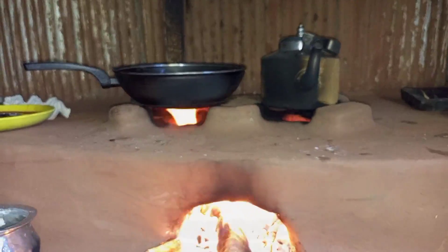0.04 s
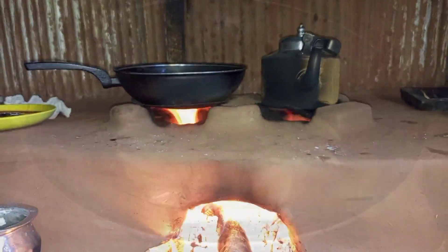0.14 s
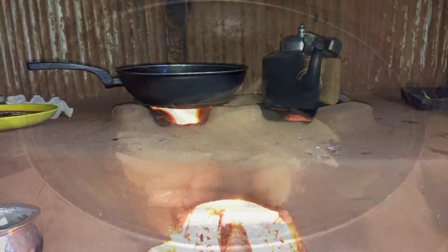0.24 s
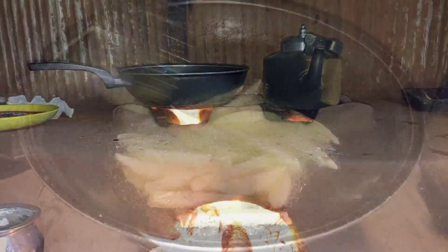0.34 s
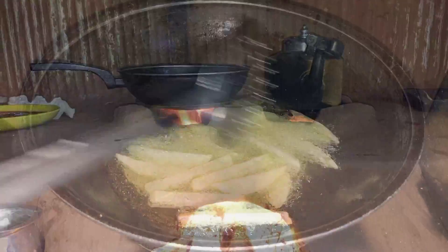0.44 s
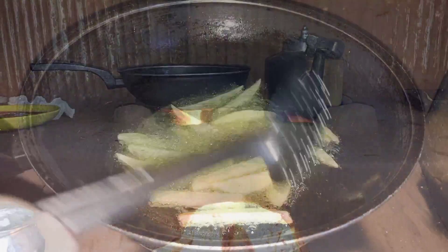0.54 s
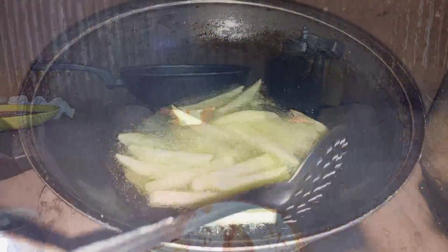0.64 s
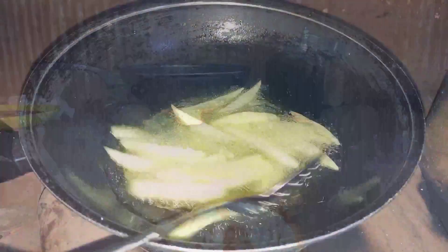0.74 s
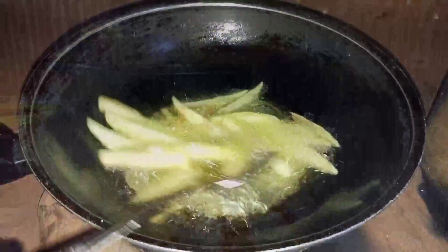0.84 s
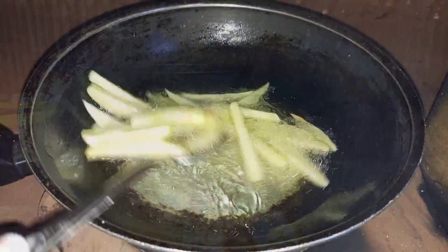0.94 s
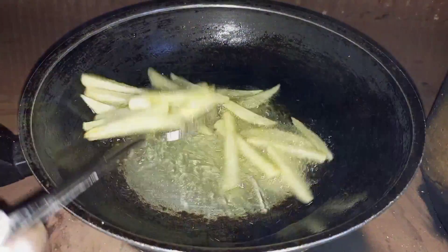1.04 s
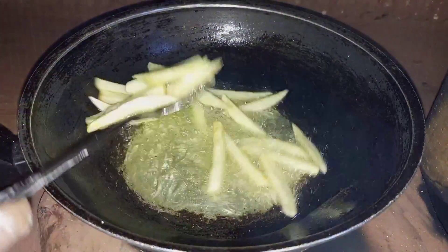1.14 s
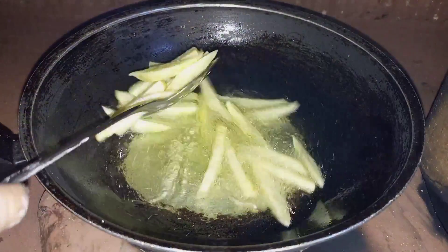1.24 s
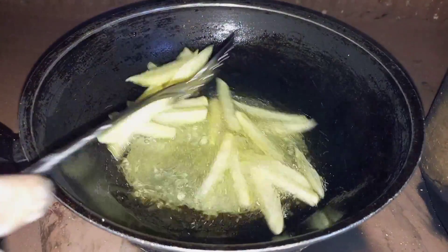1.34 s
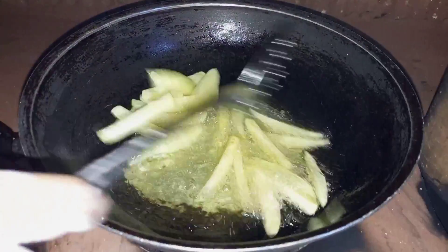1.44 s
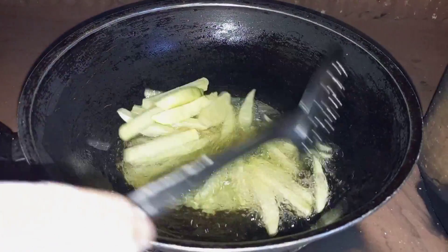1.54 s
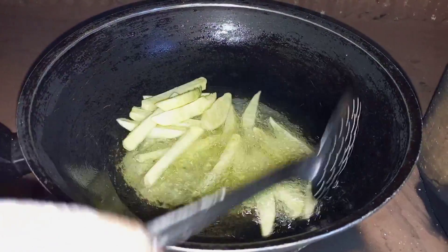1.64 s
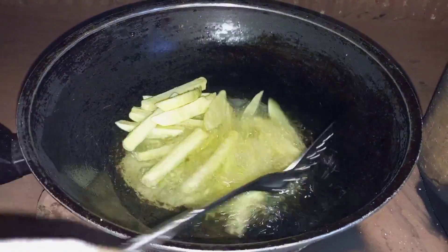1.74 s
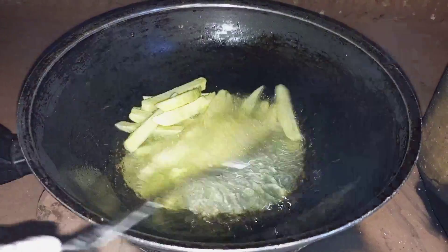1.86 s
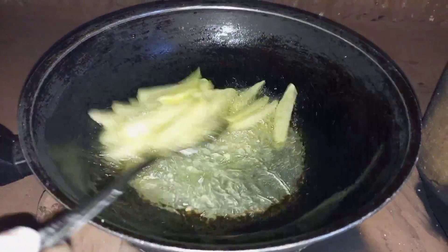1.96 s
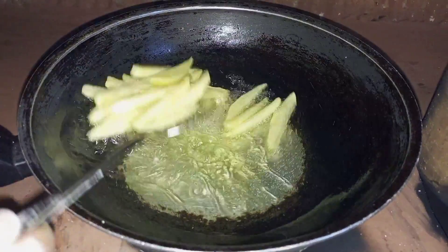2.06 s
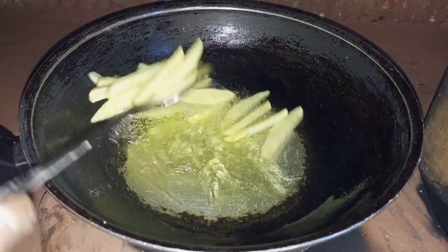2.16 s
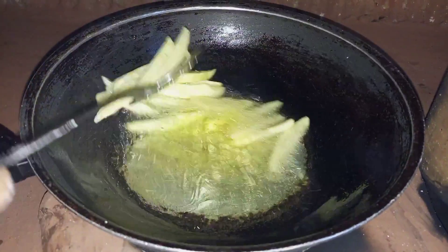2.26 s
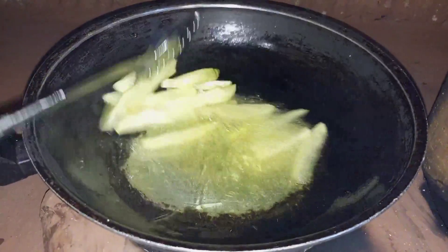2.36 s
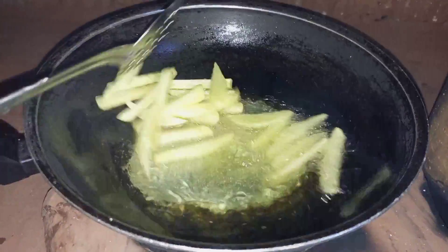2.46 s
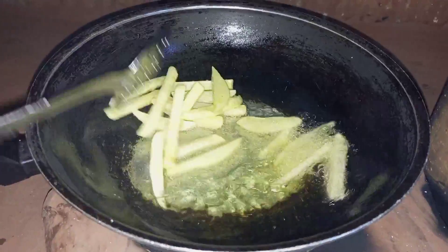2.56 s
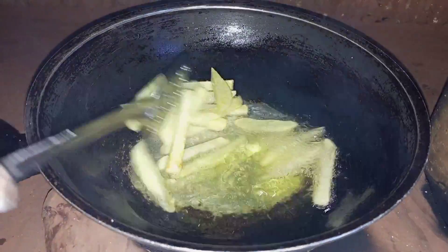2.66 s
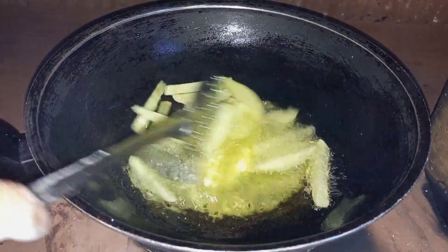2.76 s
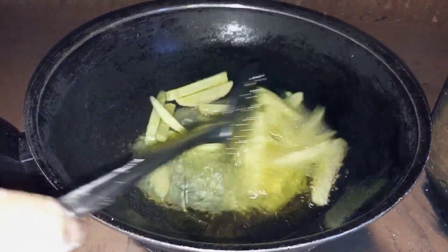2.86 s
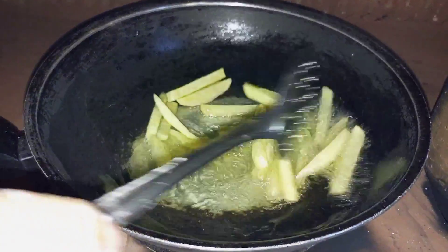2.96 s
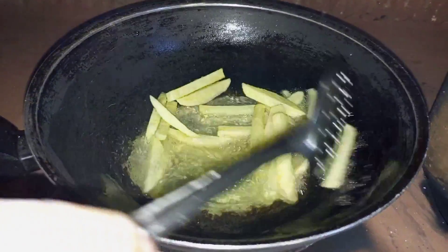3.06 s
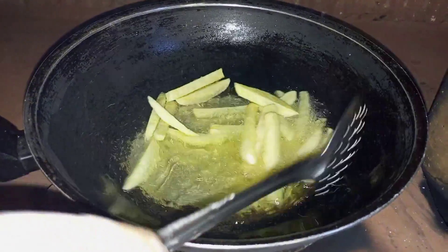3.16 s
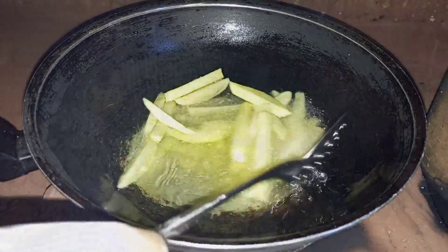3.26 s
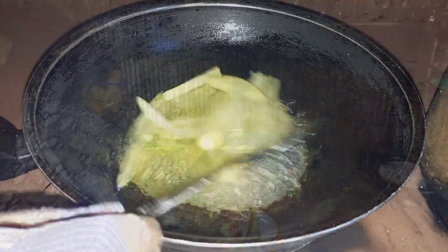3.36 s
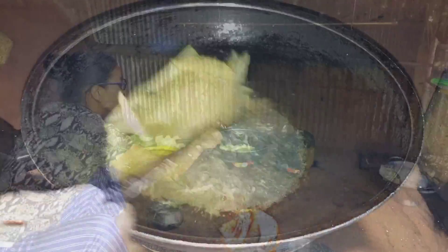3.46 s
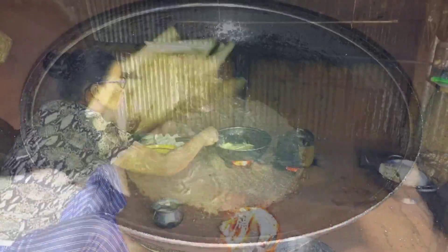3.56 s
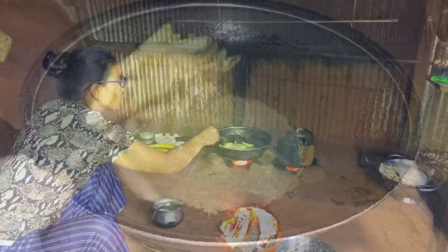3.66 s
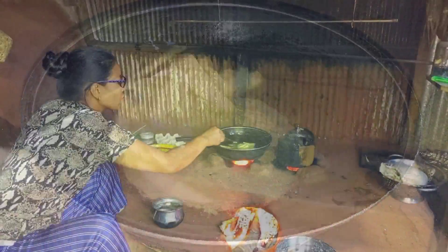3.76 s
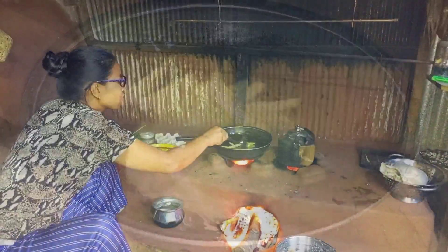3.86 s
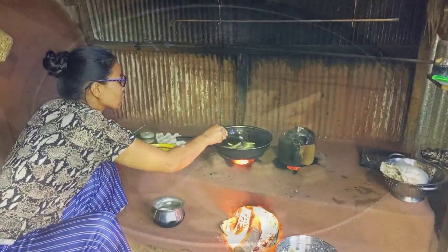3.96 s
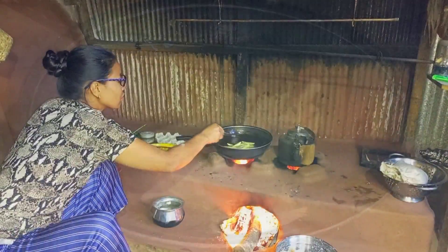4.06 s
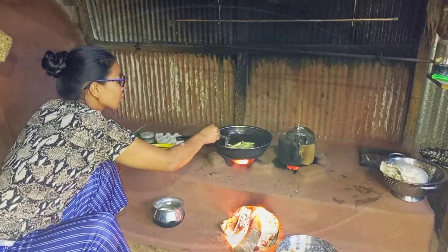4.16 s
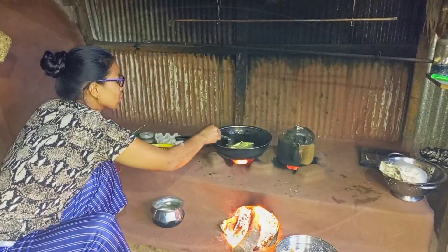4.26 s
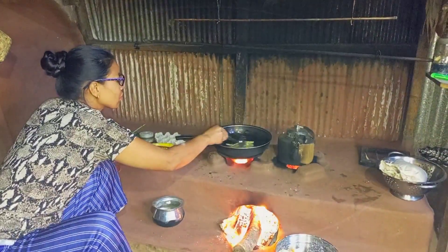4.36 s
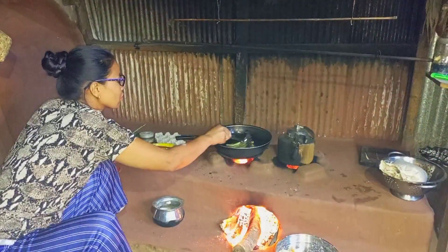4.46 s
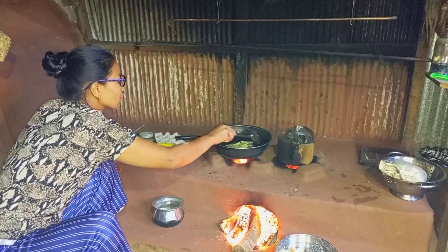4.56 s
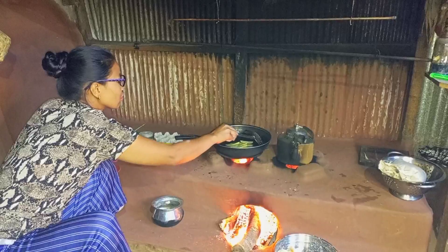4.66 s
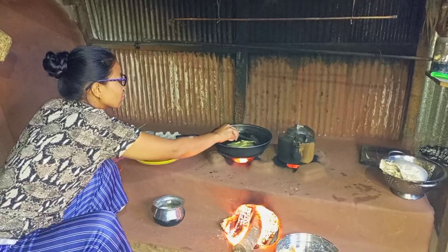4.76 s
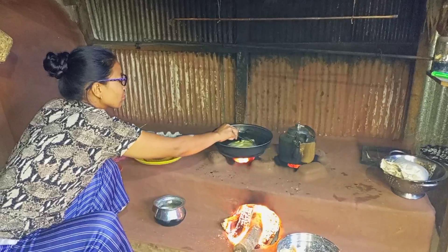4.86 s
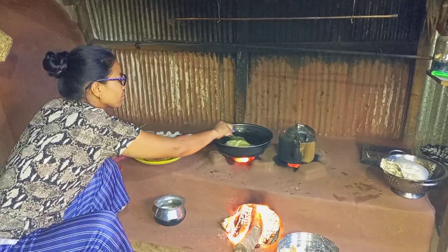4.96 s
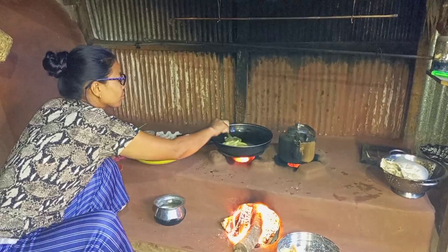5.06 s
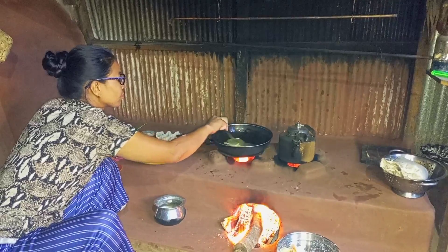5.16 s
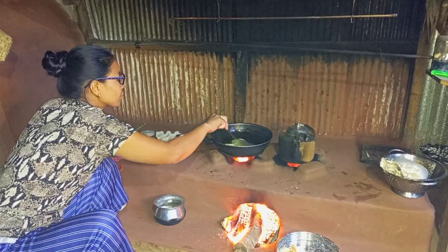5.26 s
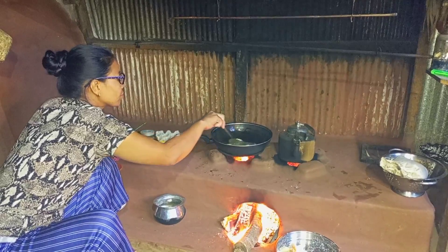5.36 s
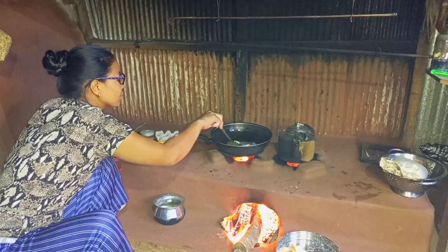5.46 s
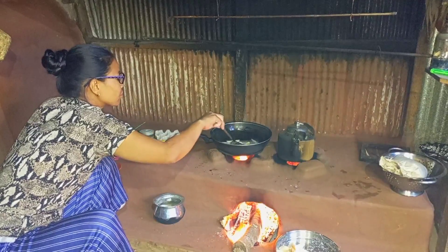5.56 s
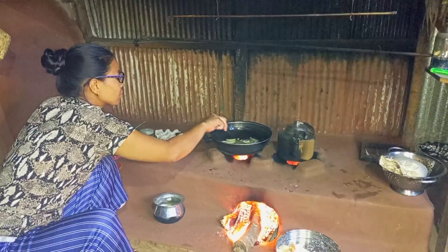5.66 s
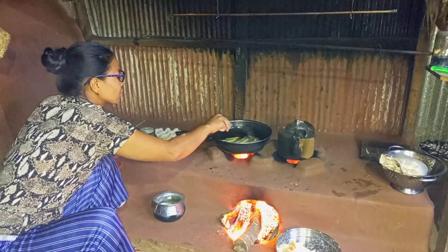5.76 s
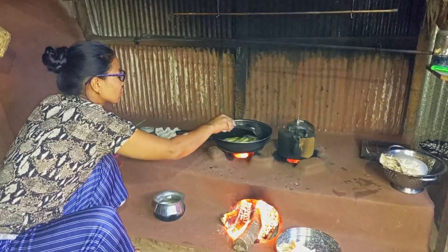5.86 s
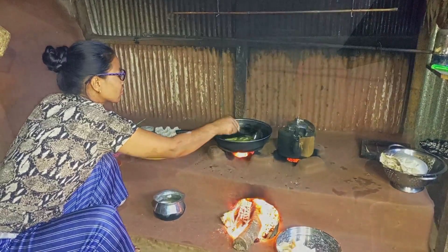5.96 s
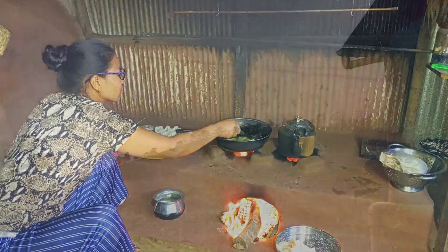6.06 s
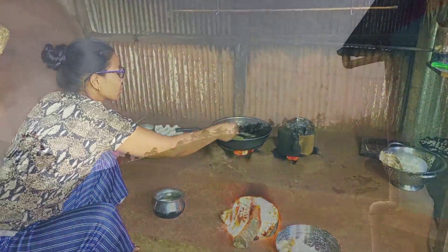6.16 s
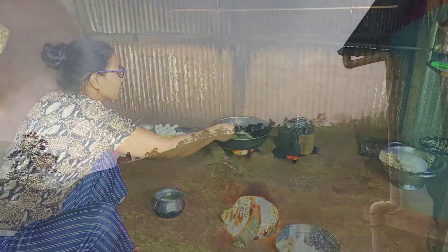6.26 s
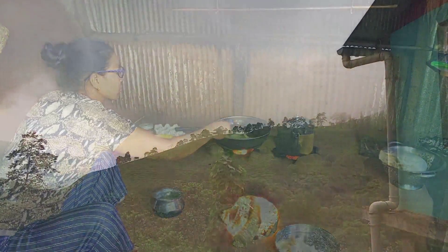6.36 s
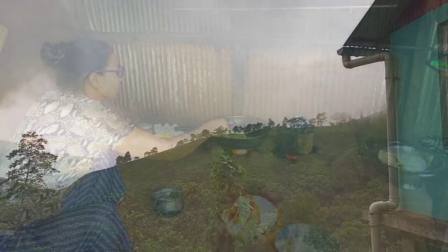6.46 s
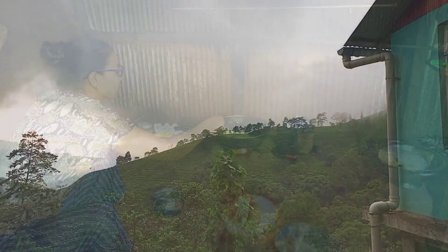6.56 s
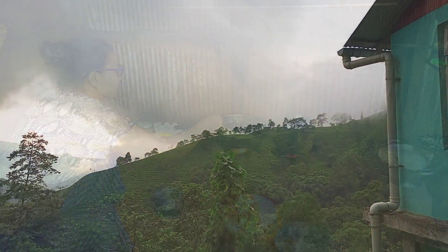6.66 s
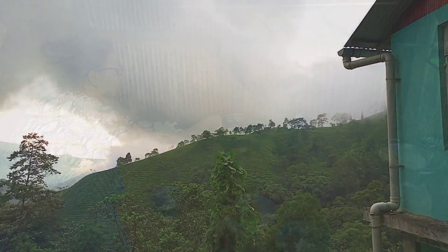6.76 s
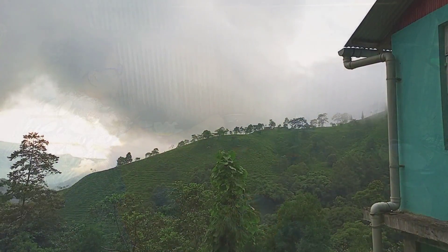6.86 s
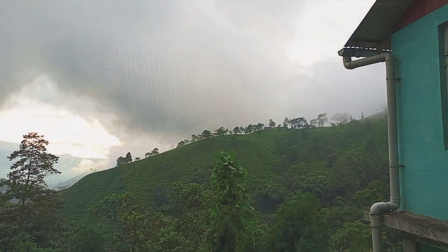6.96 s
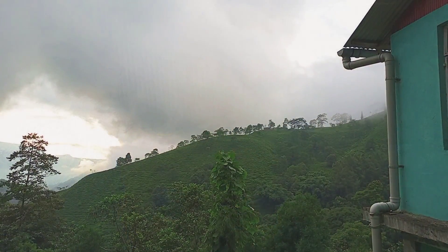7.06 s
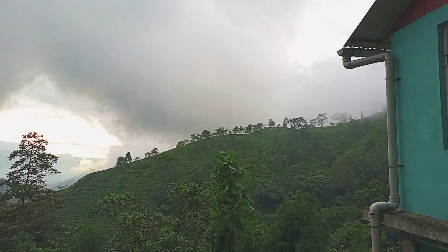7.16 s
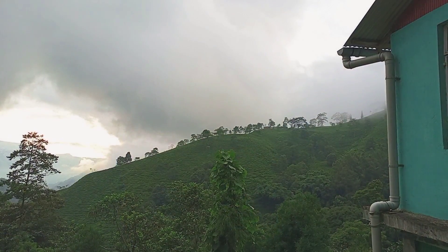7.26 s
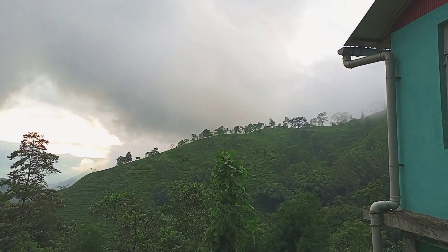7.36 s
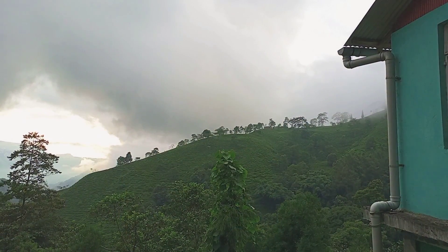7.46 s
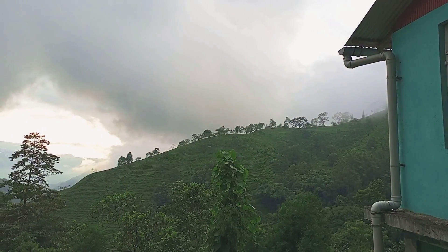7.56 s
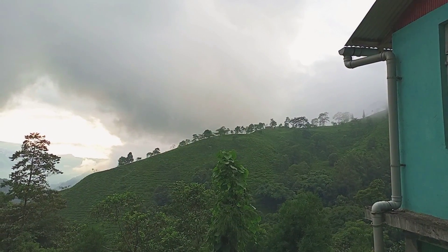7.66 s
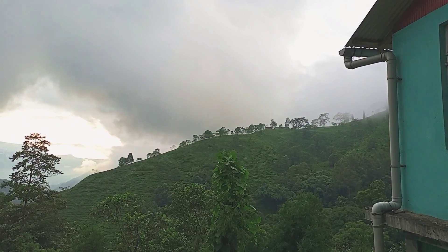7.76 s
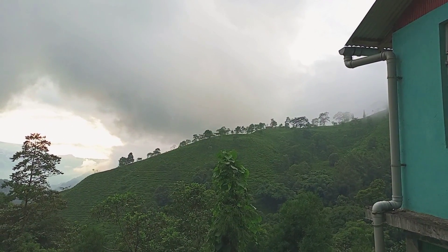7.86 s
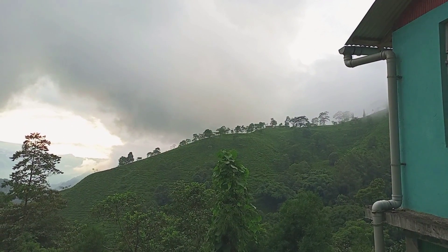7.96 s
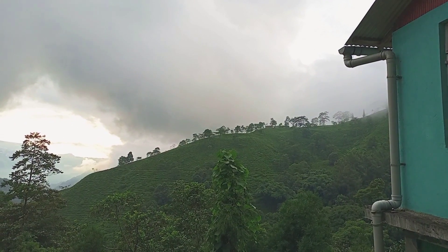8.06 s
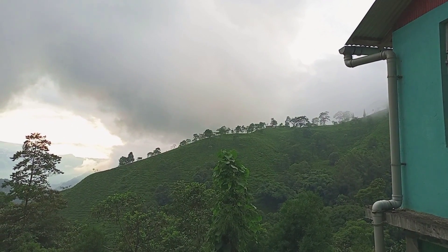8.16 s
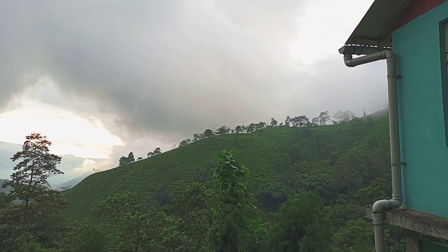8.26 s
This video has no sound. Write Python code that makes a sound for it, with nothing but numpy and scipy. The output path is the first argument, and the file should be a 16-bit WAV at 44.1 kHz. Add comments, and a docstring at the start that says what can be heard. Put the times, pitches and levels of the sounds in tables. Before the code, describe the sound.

Potato sticks sizzle and bubble in hot oil in a small kitchen, with the faint low rumble of a wood fire underneath. A metal spatula knocks against the wok and scrapes across it, some strokes rising in pitch. After about four seconds the frying grows quieter and the strokes become sparser. Near the end it fades into a steady hillside hiss with chirring insects. The sound is mono.

```python
"""Potatoes frying in a wok

Potato sticks fry over a wood fire: steam bubbles burst in the oil while a slotted metal spatula turns them.
Each stroke lands with a knock, scrapes over the bottom and rises in pitch as the blade climbs the wall.
The kitchen then fades into the steady hiss of a hillside with insects. Mono."""
import sys
import numpy as np
from scipy import signal
from scipy.fft import rfft, irfft, next_fast_len
from scipy.io import wavfile

SR = 44100
rng = np.random.default_rng(int(sys.argv[2]) if len(sys.argv) > 2 else 0)


def file_out(sig):
    """Save sig as 16-bit WAV at sys.argv[1]."""
    # one column per channel
    cols = np.atleast_2d(sig).T
    # limit, then scale
    lim = np.clip(cols, -1, 1)
    pcm = np.round(lim * 32767).astype(np.int16)
    wavfile.write(sys.argv[1], SR, pcm)


N = 366559
T = np.arange(N) / SR

# Frying oil. Each row: time in seconds, level in dB before flares.
OIL_LEVEL = [(0.0, -54), (0.55, -56.5), (1.17, -51), (1.42, -49), (1.63, -47), (2.15, -49), (2.6, -45.5),
             (2.78, -51.5), (3.03, -49.5), (3.32, -48.5), (4.22, -59), (5.37, -57.5), (5.64, -55.5),
             (5.98, -56.5), (6.16, -59.5), (6.45, -65)]
# Oil left alone and freshly stirred. Each row: frequency in Hz, relative density in dB.
CALM_SPECTRUM = [(100, -35), (500, -35), (1300, -20.5), (2600, -8), (3500, -12.5), (4600, -11.5),
                 (5100, -1), (5600, 2), (7400, -4.5), (9200, 1.5), (10400, -2.5), (10900, -13),
                 (13800, -24), (14700, -9.5)]
STIRRED_SPECTRUM = [(100, -41), (500, -24), (1300, -18), (1900, -11), (3300, -16), (4650, -17), (5050, -21),
                    (6300, 2.5), (8000, -2.5), (9000, 2), (10500, -6.5), (11000, -17), (13900, -22),
                    (14900, -13.5)]

def sizzle(pop_s=0.00029, spit_gain=0.43, flutter_db=0.94, calm_db=-56, stirred_db=-48):
    """Steam bubbles burst over a fine fizz; stirring makes the oil spit and changes its colour."""
    t = np.arange(SR // 100) / SR
    pops = np.zeros(N)
    for hz in np.linspace(1000, 15500, 20):
        pop = np.exp(-t / pop_s) * np.cos(2 * np.pi * hz * t)
        pops += signal.oaconvolve(clicks(per_s=700, spread_db=2.2), pop)[:N]
    oil_db = np.interp(T, *np.transpose(OIL_LEVEL))
    stirred = np.clip((oil_db - calm_db) / (stirred_db - calm_db), 0, 1)
    spits = unit(clicks(per_s=260, spread_db=3)) * (0.1 + stirred)
    fizz = rng.standard_normal(N)
    bursts = (unit(pops) + spit_gain * spits + fizz) * amp(flutter_db * wander(35))
    oil = (1 - stirred) * colour(bursts, CALM_SPECTRUM) + stirred * colour(bursts, STIRRED_SPECTRUM)
    return level(OIL_LEVEL, fade_s=0.89) * flare() * oil


# Flares of the sizzle. Each row: start in seconds, rise in dB.
FLARES = [(.67, 0.5), (1.38, 2), (2.72, 5.5), (3.075, 4)]

def flare(peak_s=0.038):
    """Gain of the sizzle as wet potato meets the oil: a quick rise, then a decay."""
    ages = [(np.maximum(T - start, 0) / peak_s, db) for start, db in FLARES]
    return amp(sum(db * age * np.exp(1 - age) for age, db in ages))


# Steam jets. Each entry: pitch in Hz.
JET_PITCHES_HZ = [5145, 5660, 6100, 6700]

def steam_jets(gain_db=-11, swell_db=4.0, width_hz=420):
    """Jets of steam swell and fade, each at its own pitch."""
    jets = np.zeros(N)
    for hz in JET_PITCHES_HZ:
        jet = resonate(rng.standard_normal(N), np.full(N, hz), width_hz)
        jets += jet * amp(swell_db * wander(15))
    return amp(gain_db) * level(OIL_LEVEL, fade_s=0.88) * unit(jets)


def bubbles(gain_db=-19, t60_s=0.095, rise_s=0.0043, pitches=48):
    """Larger bubbles each ring briefly at one pitch in the bowl of the wok."""
    t, out = np.arange(SR // 6) / SR, np.zeros(N)
    envelope = amp(-60 * t / t60_s) * (1 - np.exp(-t / rise_s))
    for hz in np.geomspace(1200, 6500, pitches) * rng.uniform(0.98, 1.02, pitches):
        plink = envelope * np.sin(2 * np.pi * hz * t)
        out += signal.oaconvolve(clicks(per_s=22, spread_db=3.5), plink)[:N]
    loudest = level(OIL_LEVEL).max()
    compressed_level = loudest * (level(OIL_LEVEL, fade_s=0.86) / loudest) ** 0.55
    return amp(gain_db) * compressed_level * unit(out)


# Modes of the wok, the clank and the blade. Each row: frequency in Hz, relative level in dB, t60 in seconds.
WOK_MODES = [(342.3, -4.5, 0.15), (382.5, -17.5, 0.32), (470, -8.5, 0.038), (573.4, 5, 0.14),
             (675, -5, 0.11), (806, -2.5, 0.21), (982, -8.5, 0.1), (1084, 0.5, 0.043), (1226.5, -3, 0.17),
             (1400, -7, 0.053), (1462, -3.5, 0.09)]
CLANK_MODES = [(1524, -24.5, 0.33), (1840, 3, 0.047), (1930, -17, 0.27), (2064, 4, 0.12),
               (2560, 11.5, 0.069), (2760, -10, 0.093), (3130, -23, 0.42), (3236, 6.5, 0.12),
               (3950, -10.5, 0.31)]
BLADE_MODES = [(4043, -17.5, 0.33), (4640, -6, 0.11), (4934, 6, 0.07), (4980, 0.5, 0.18), (5440, 4.5, 0.19),
               (5360, 5, 0.017), (6220, 9, 0.013), (6390, 2, 0.12), (6440, -39, 0.036), (6060, -10, 0.051),
               (7500, -32, 0.55), (7600, -8.5, 0.14), (7360, 7.5, 0.17), (9300, 10.5, 0.027),
               (9720, 0, 0.041), (9070, 1, 0.046), (11100, -9, 0.087)]
# Spatula blows. Each row: start in seconds, wok level in dB, wok centre in Hz, clank level in dB,
# blade level in dB, blade centre in Hz, contact time in seconds.
BLOWS = [(.307, -71, 520, -76, -69, 6000, .003), (.760, -43, 423, -51, -36.5, 8100, 0.0067),
         (1.035, -51.5, 1300, -73, -68, 6000, 0.0012), (1.512, -61.5, 350, -62, -68, 6000, .004),
         (1.818, -35.5, 477, -40.5, -31.5, 6000, 0.0067), (1.874, -39.5, 1070, -59, -50, 5130, .008),
         (1.940, -47.5, 340, -52, -46, 5530, 0.0036), (1.973, -44.5, 1320, -50, -51, 6000, 0.0022),
         (2.046, -40.5, 1000, -46.5, -56, 6000, 0.002), (2.527, -46.5, 740, -71, -57, 6200, 0.0032),
         (3.343, -36, 490, -57, -42, 8950, 0.0018), (3.352, -38, 1040, -49, -35.5, 6300, 0.013),
         (3.386, -40.5, 413, -56, -52, 5100, 0.0063), (4.060, -57, 487, -58.5, -48.5, 6900, 0.013),
         (4.880, -44.5, 1130, -60.5, -61.5, 5460, 0.011), (6.046, -50, 1440, -54, -39.5, 5280, 0.015),
         (6.786, -60, 820, -65, -63, 6000, .001)]

def knocks(chatter_rise_s=0.0042, low_cut_ratio=0.39):
    """The blade lands, chatters for a moment, and rings both itself and the wok."""
    t, out = np.arange(SR // 10) / SR, np.zeros(N)
    for start, wok_db, wok_hz, clank_db, blade_db, blade_hz, contact_s in BLOWS:
        chatter = np.exp(-t / contact_s) * (1 - np.exp(-t / chatter_rise_s))
        force = 0.15 * rng.standard_normal(len(t)) * chatter
        force[0] = 1  # first impact
        wok = ring(touched(WOK_MODES, wok_hz, focus_db=11, octaves=0.33), wash=0.9, wash_t60_s=0.21)
        wok = band_pass(wok, low_hz=low_cut_ratio * wok_hz)
        clank_modes = touched(CLANK_MODES, centre_hz=1950, focus_db=-10.5, octaves=1.0, detune=0.033)
        clank = ring(clank_modes, wash=0.77, wash_t60_s=0.21)
        blade_modes = touched(BLADE_MODES, blade_hz, focus_db=9, octaves=0.15)
        blade = ring(blade_modes, wash=0.45, wash_t60_s=0.11)
        for db, part in [(wok_db, wok), (clank_db, clank), (blade_db, blade)]:
            add(out, start, amp(db) * onset_unit(signal.fftconvolve(force, part)))
    return band_pass(out)


def touched(modes, centre_hz, focus_db, octaves, detune=0.00494, uneven_db=4.5):
    """The contact point boosts or cuts modes near a centre; the pressing blade detunes them a little."""
    hz, db, t60_s = np.transpose(modes)
    shift, scatter = rng.standard_normal((2, len(hz)))
    contact_db = focus_db * np.exp(-(np.log2(hz / centre_hz) / octaves) ** 2)
    return np.transpose([hz * (1 + detune * shift), db + contact_db + uneven_db * scatter, t60_s])


def ring(modes, wash, wash_t60_s):
    """Struck metal: clear modes in a wash of reflections of the same colour."""
    t = np.arange(SR // 3) / SR
    tones = sum(amp(db - 60 * t / t60_s) * np.sin(2 * np.pi * (hz * t + rng.random()))
                for hz, db, t60_s in modes)
    outline = sorted((hz, db) for hz, db, _ in modes)
    outline = [(outline[0][0] / 2, -45), *outline, (outline[-1][0] * 1.4, -35)]
    reflections = colour(rng.standard_normal(len(t)), outline) * amp(-60 * t / wash_t60_s)
    return onset_unit(onset_unit(tones) + wash * onset_unit(reflections))


def band_pass(x, low_hz=210, high_hz=10500):
    """Softens the bass and extreme treble of the knocks and scrapes."""
    return signal.sosfilt(signal.butter(4, [low_hz, high_hz], "band", fs=SR, output="sos"), x)


# Blade dragged over the bottom. Each row: start in seconds, length in seconds, pressure in dB, easing in
# dB per second, first hollow pitch in Hz, rasp offset in dB, thud level in dB.
DRAGS = [(.835, 0.082, -51.5, 10, 510, 7.5, -62.5), (.968, 0.083, -53, 7, 670, 2.5, -88),
         (1.095, 0.1, -52, 20, 660, -6, -90), (1.51, 0.12, -55.5, 55, 530, 1, -73),
         (1.835, 0.093, -45.5, 11, 670, 3, -52.5), (1.985, 0.12, -42.5, 27, 618, -2, -69),
         (2.54, 0.078, -54.5, 40, 780, -2, -64.5), (2.8, 0.079, -62, 22, 667, 5, -79),
         (3.38, 0.37, -52.5, 36, 588, 5, -57), (3.78, 0.13, -61, 29, 694, 2.5, -81),
         (4.41, 0.041, -62.5, 22, 730, -3, -90), (4.885, 0.33, -50, 52.5, 648, 0, -89),
         (6.055, 0.29, -52.5, 70, 660, 1, -61.5), (6.785, 0.024, -58, 54, 740, -3, -92)]

def scrapes(wok_db=-6, hollow_db=-5, clank_db=-9, judder_db=3, hollow_width_hz=200, waver=0.04):
    """The blade sticks and slips; each slip rings the wok and a hollow resonance that shifts with it."""
    slips = clicks(per_s=2500, spread_db=1.0) * amp(judder_db * wander(55))
    wok_modes = touched(WOK_MODES, centre_hz=1200, focus_db=6, octaves=0.98, detune=0)
    wok_ring = ring(wok_modes, wash=0.87, wash_t60_s=0.09)
    clank_modes = touched(CLANK_MODES, centre_hz=1720, focus_db=24.5, octaves=0.25, detune=0)
    clank_ring = ring(clank_modes, wash=0.34, wash_t60_s=0.1)
    wok, clank = (unit(signal.fftconvolve(slips, part)[:N]) for part in (wok_ring, clank_ring))
    metal = amp(wok_db) * wok + amp(clank_db) * clank
    pressure, rasp, hollow_hz = blade_motion()
    hollow_hz *= 1 + waver * wander(20)  # uneven bottom
    hollow = amp(hollow_db) * unit(resonate(slips, hollow_hz, hollow_width_hz))
    return band_pass(pressure * hollow + rasp * metal)


def blade_motion(bite_s=0.015, lift_db_per_s=210, rasp_fade_db_per_s=2,
                 slide_oct_per_s=0.4, lift_oct_per_s=2.3):
    """Pressure, rasp and hollow pitch: each stroke bites, eases off as it slides forward, and lifts."""
    pressure, rasp, hz = np.zeros(N), np.zeros(N), np.full(N, float(DRAGS[0][4]))
    for start, length_s, db, easing_db_per_s, hollow_hz, rasp_db, _ in DRAGS:
        t = np.maximum(T - start, 0)
        held_s = np.minimum(t, length_s)
        lifted_s = t - held_s
        push = np.minimum(t / bite_s, 1) * amp(db - easing_db_per_s * held_s - lift_db_per_s * lifted_s)
        pressure += push
        rasp += push * amp(rasp_db - rasp_fade_db_per_s * t)
        octaves = np.minimum(slide_oct_per_s * held_s + lift_oct_per_s * lifted_s, 1)
        hz = np.where(t > 0, hollow_hz * 2 ** octaves, hz)
    return pressure, rasp, hz


def thuds(length_s=0.1, hz=346.2, width_hz=95):
    """The first push of each stroke gives a low thud."""
    return whistles([(start, length_s, hz, hz, width_hz, db) for start, *_, db in DRAGS])


# Blade climbing the wall, then steady tones of blade, rubbed wok and steam.
# Each row: start in seconds, length in seconds, starting pitch in Hz, relative level in dB.
WALL_CLIMBS = [(0.862, .08, 1650, -61), (1.205, .155, 1580, -55), (1.549, 0.09, 1700, -59),
               (2.272, .16, 1944, -57.5), (3.741, .09, 2694, -65.5), (6.328, 0.18, 1550, -76)]
STEADY_SQUEALS = [(0, .13, 2600, -66), (0.145, 0.36, 5530, -64), (1.67, .096, 3105, -58.5),
                  (1.884, 0.081, 5320, -55.5), (2.129, .16, 590, -59.5), (2.622, 0.14, 6220, -49.5),
                  (3.397, .07, 3330, -56), (3.425, .048, 6160, -42), (3.43, 0.24, 1200, -60.5),
                  (3.45, .26, 569, -60), (4.274, .07, 5000, -72.5), (4.885, 0.056, 2710, -56),
                  (4.9, .19, 803, -57), (6.08, 0.093, 4830, -63), (6.082, 0.073, 2520, -62),
                  (6.15, .05, 3250, -67.5), (6.259, 0.088, 1210, -70)]

def squeals(gain_db=-3, judder_db=3, climb_oct_per_s=5.1, climb_width_ratio=0.38, steady_width_ratio=0.068):
    """The blade judders up the wall in a rising tone; blade, wok and steam sing briefly at one pitch."""
    rising = whistles([(start, length_s, hz, hz * 2 ** (climb_oct_per_s * length_s),
                        climb_width_ratio * hz, db) for start, length_s, hz, db in WALL_CLIMBS])
    steady = whistles([(start, length_s, hz, hz, steady_width_ratio * hz, db)
                       for start, length_s, hz, db in STEADY_SQUEALS])
    judder = amp(judder_db * wander(120))
    return amp(gain_db) * kitchen((rising + steady) * judder, wet_db=-1.5)


# Wok on the stove. Each row: start in seconds, pitch in Hz, level in dB.
STOVE_BUMPS = [(1.37, 145, -75), (2.06, 101, -69), (2.81, 121, -70), (3.411, 163, -64), (6.051, 187, -69)]

def bumps(length_s=0.054, width_ratio=0.3):
    """The wok rocks softly on the stove."""
    return whistles([(start, length_s, hz, hz, width_ratio * hz, db) for start, hz, db in STOVE_BUMPS])


# Fire and air. Each row: time in seconds, relative level in dB.
FIRE_LEVEL = [(0, -77.5), (1.2, -78), (1.6, -73), (3.1, -72.5), (3.8, -76.5), (5.7, -76.5), (6.6, -80),
              (7.4, -75.5), (8.3, -76.5)]
# Each row: frequency in Hz, relative density in dB.
FIRE_SPECTRUM = [(20, -26), (40, -18), (85, -4), (150, 0), (300, -4), (700, -4), (1300, -6.5),
                 (2500, -19.5)]

def fire(gain_db=2, lump_db=2.8):
    """Lumpy low noise of the fire and the air."""
    lumpy_noise = rng.standard_normal(N) * amp(lump_db * wander(26))
    return amp(gain_db) * level(FIRE_LEVEL) * colour(lumpy_noise, FIRE_SPECTRUM)


# Hillside hiss. Each row: time in seconds, level in dB.
HILL_LEVEL = [(6.3, -70), (6.6, -69), (6.95, -64.5), (7.3, -61), (7.65, -59.5), (8, -60.5), (8.3, -59.5)]
# Each row: frequency in Hz, relative density in dB.
HILL_SPECTRUM = [(200, -37), (1100, -21), (1400, -5), (2200, 1), (3100, 0.5), (3800, -5), (5100, 3.5),
                 (7100, -3), (7800, -13), (9000, -6.5), (10500, -11.5), (11000, -37), (13800, -55),
                 (15200, -24)]
# Thin calls and a low hoot. Each row: start in seconds, length in seconds, pitch in Hz, width in Hz,
# level in dB.
HILL_CALLS = [(6.65, .95, 7280, 170, -74), (7.6, 1., 7220, 180, -75), (7.22, .08, 4000, 500, -63),
              (7.34, .22, 225, 60, -77), (7.7, .36, 4250, 100, -72), (8.13, .26, 4600, 110, -69)]

def hillside(chirr_db=-9, throb_db=2.8, chirr_hz=2500, chirr_width_hz=1300):
    """A wide, distant hiss fades in, with an uneven chirr of insects and a few calls."""
    hiss = colour(rng.standard_normal(N), HILL_SPECTRUM)
    chirr = resonate(rng.standard_normal(N), np.full(N, chirr_hz), chirr_width_hz)
    chirr = unit(chirr * amp(throb_db * wander(70)))
    calls = whistles([(start, length_s, hz, hz, width_hz, db)
                      for start, length_s, hz, width_hz, db in HILL_CALLS])
    return level(HILL_LEVEL, fade_s=0.073) * (hiss + amp(chirr_db) * chirr) + calls


def kitchen(x, wet_db, t60_s=0.12):
    """Adds the short, dense reflections of the tin walls."""
    t = np.arange(SR // 3) / SR
    tail = rng.standard_normal(len(t)) * amp(-60 * t / t60_s) * (t > 0.004)
    return x + amp(wet_db) * signal.fftconvolve(x, tail / np.linalg.norm(tail))[:N]


def whistles(rows):
    """One band of noise per row, gliding between two pitches as it swells and dies."""
    out = np.zeros(N)
    for start, length_s, first_hz, last_hz, width_hz, db in rows:
        count = int(length_s * SR)
        noise = rng.standard_normal((2, 2 * SR))
        lowpass = signal.butter(2, width_hz / 2, fs=SR, output="sos")
        baseband = signal.sosfilt(lowpass, noise[0] + 1j * noise[1])[-count:]
        carrier = np.exp(2j * np.pi * np.cumsum(np.geomspace(first_hz, last_hz, count)) / SR)
        add(out, start, amp(db) * unit((baseband * carrier).real * signal.windows.tukey(count, 0.5)))
    return out


def resonate(x, hz, width_hz):
    """A resonance that follows the curve hz; a double pole gives steep skirts."""
    carrier = np.exp(2j * np.pi * np.cumsum(hz) / SR)
    pole = np.exp(-np.pi * width_hz / SR)
    return (carrier * signal.lfilter([(1 - pole) ** 2], [1, -2 * pole, pole * pole], x / carrier)).real


def clicks(per_s, spread_db):
    """Random clicks of either sign: many small, a few large."""
    size = amp(spread_db * np.minimum(rng.exponential(1, N), 6))
    return size * rng.choice([-1, 1], N) * (rng.random(N) < per_s / SR)


def wander(per_s):
    """A slow random curve of rms about 1."""
    knots = rng.standard_normal(N // 20)
    return np.interp(T * per_s, np.arange(len(knots)), knots) * np.sqrt(3 / 2)


def colour(x, spectrum):
    """Filters x through (Hz, dB) points, to rms 1."""
    hz, db = np.transpose(spectrum)
    size = next_fast_len(len(x))
    gain = amp(np.interp(np.log(np.fft.rfftfreq(size, 1 / SR) + 1), np.log(hz), db))
    return unit(irfft(rfft(x, size) * gain, size)[:len(x)])


def level(curve, fade_s=0.058):
    """Gain that follows (seconds, dB) rows and fades out beyond their ends."""
    times, db = np.transpose(curve)
    gate = np.interp(T, [times[0] - fade_s, times[0], times[-1], times[-1] + fade_s], [0, 1, 1, 0])
    return amp(np.interp(T, times, db)) * gate


def add(mix, start_s, sound):
    part = mix[max(round(start_s * SR), 0):][:len(sound)]
    part += sound[:len(part)]


def amp(db):
    return 10 ** (np.asarray(db) / 20)


def unit(x):
    """Scales to rms 1."""
    return x / np.sqrt(np.mean(x ** 2) + 1e-20)


def onset_unit(x):
    """Scales to rms 1 over the first 20 ms."""
    return x / np.sqrt(np.mean(x[:SR // 50] ** 2))


def scene():
    oil = kitchen(sizzle(), wet_db=-11.5) + steam_jets() + bubbles()
    spatula = knocks() + scrapes() + squeals()
    low_sounds = fire() + thuds() + bumps()
    mono = oil + spatula + low_sounds + hillside()
    return np.array([mono, mono])


def record(dry):
    """Steep low-pass at 15.5 kHz."""
    lowpass = signal.firwin(801, 15500, window=("kaiser", 9), fs=SR)
    return signal.oaconvolve(dry, lowpass[None], "same")


dry = scene()
out = record(dry)
file_out(out)
```